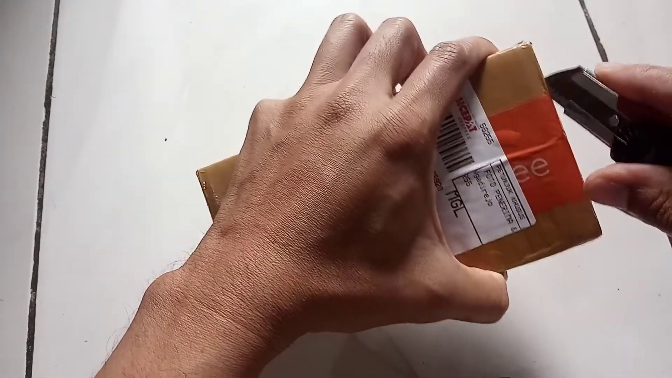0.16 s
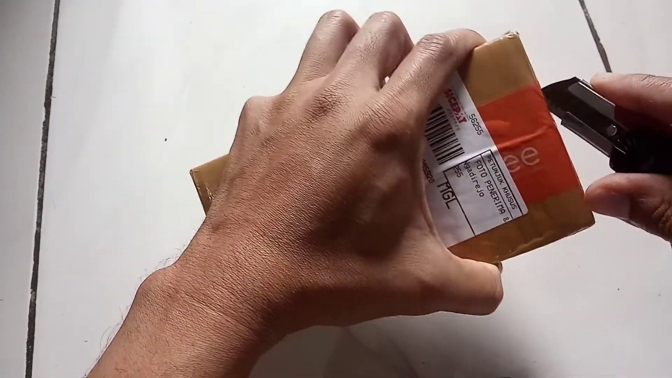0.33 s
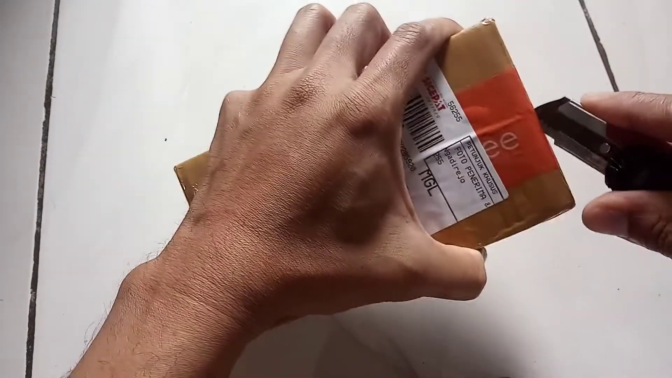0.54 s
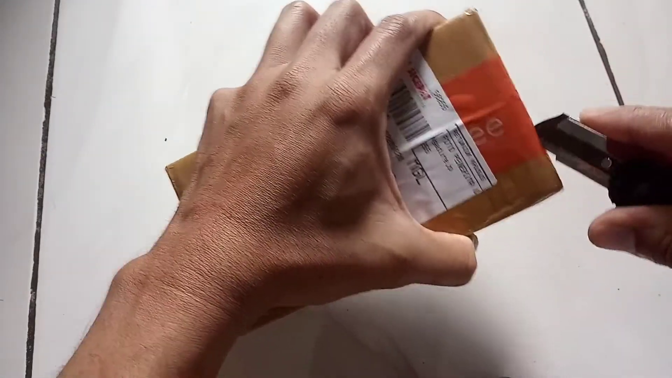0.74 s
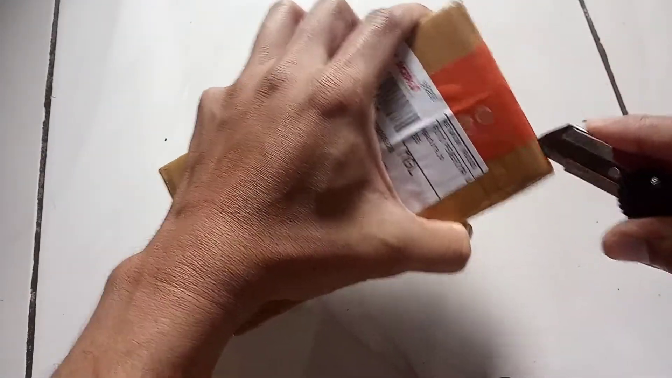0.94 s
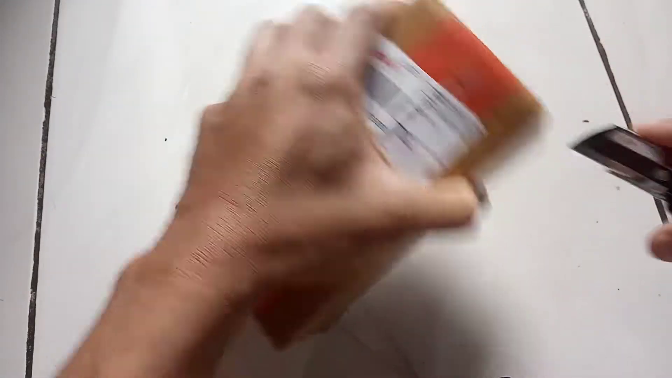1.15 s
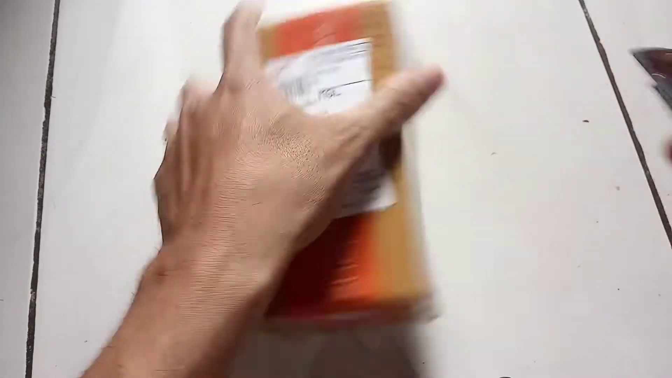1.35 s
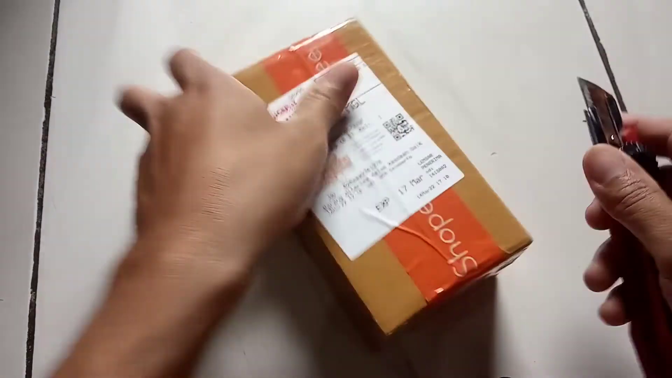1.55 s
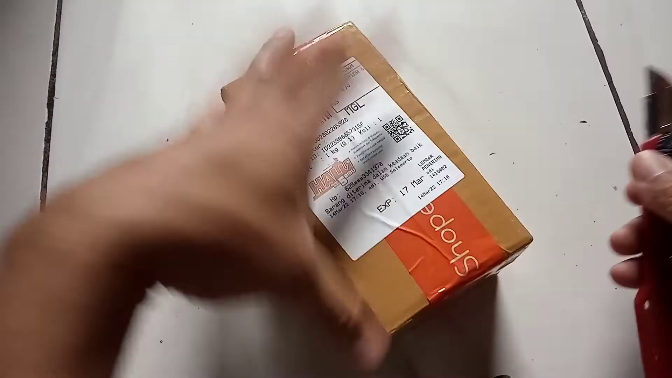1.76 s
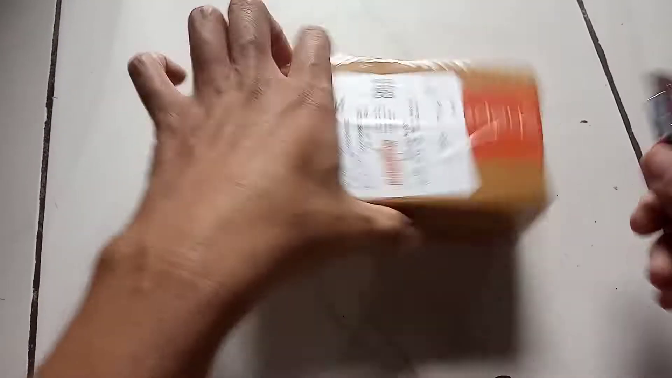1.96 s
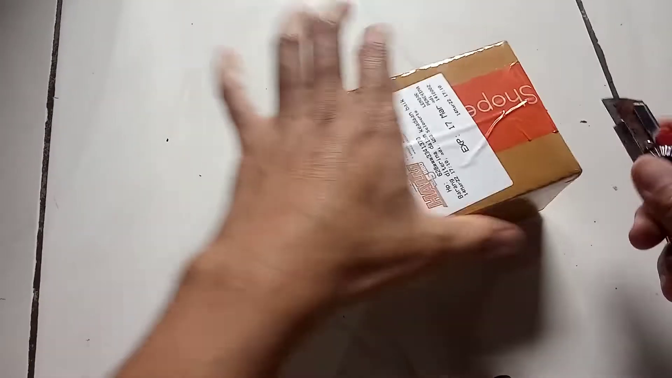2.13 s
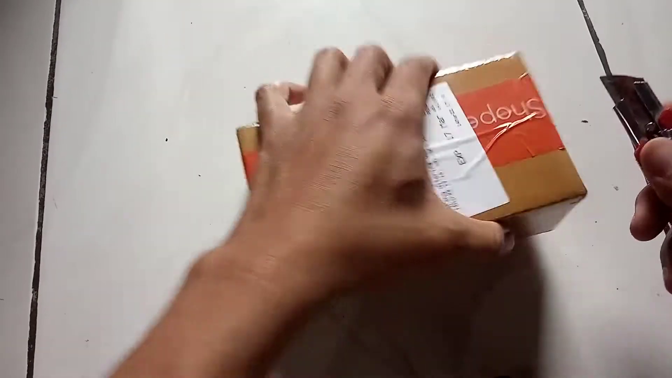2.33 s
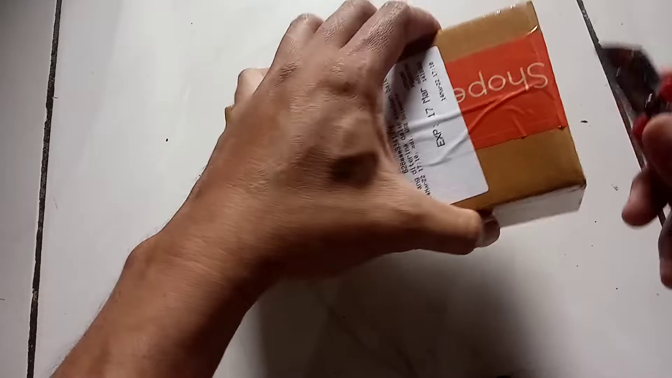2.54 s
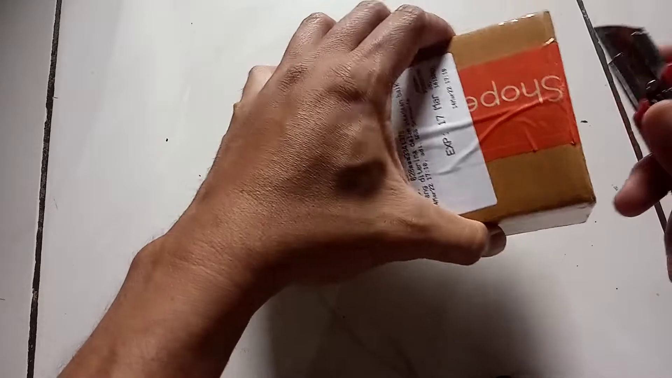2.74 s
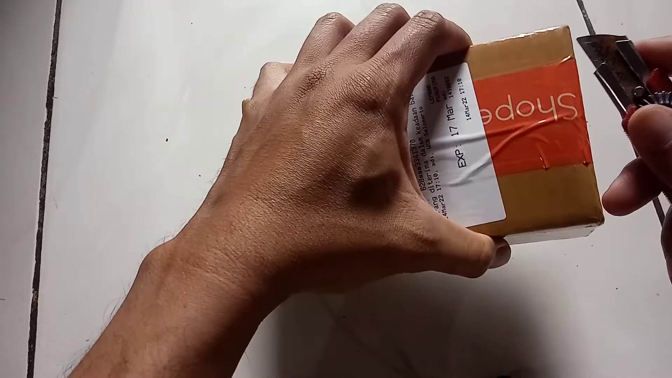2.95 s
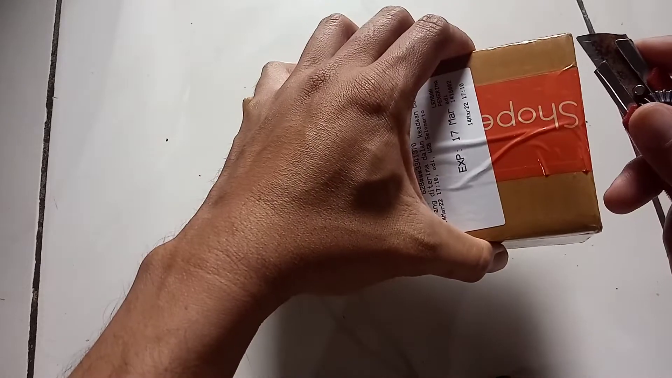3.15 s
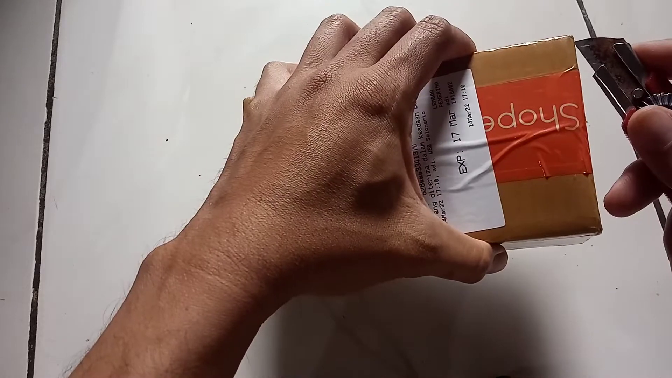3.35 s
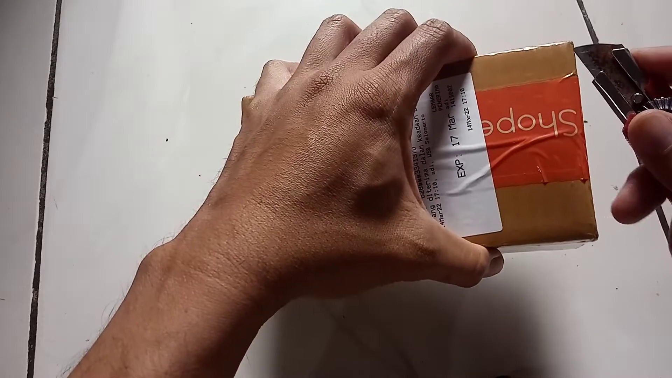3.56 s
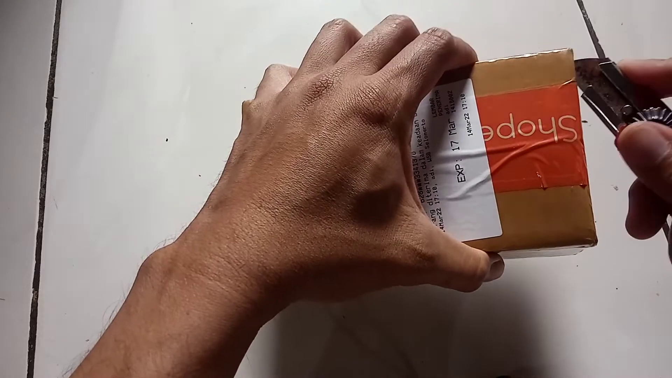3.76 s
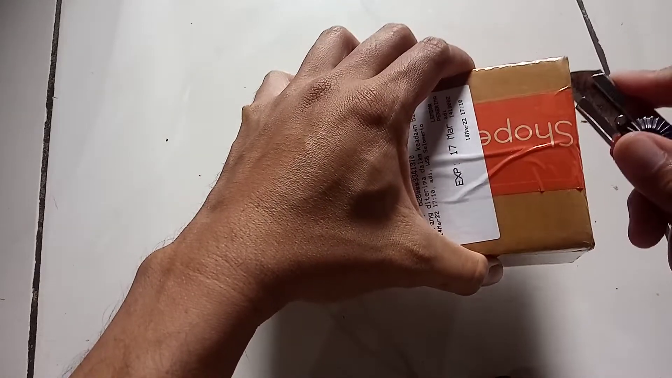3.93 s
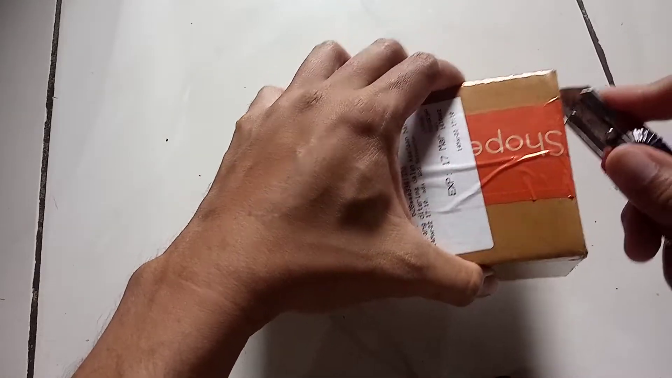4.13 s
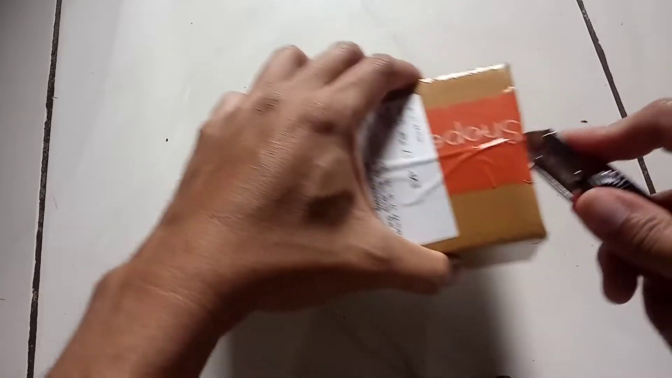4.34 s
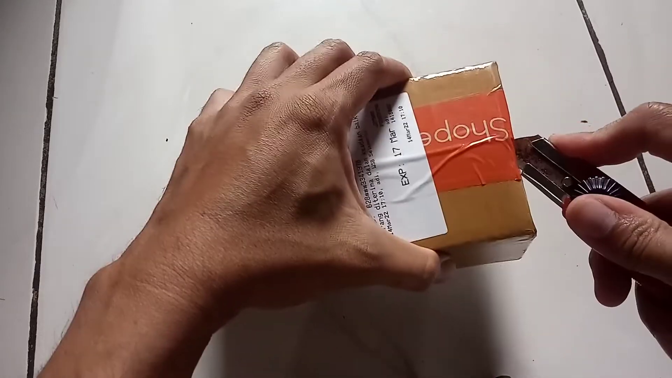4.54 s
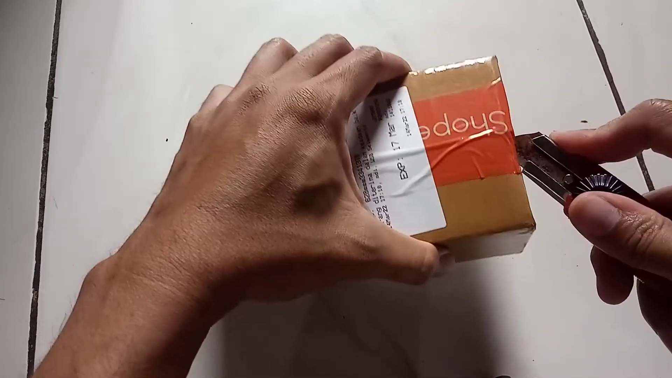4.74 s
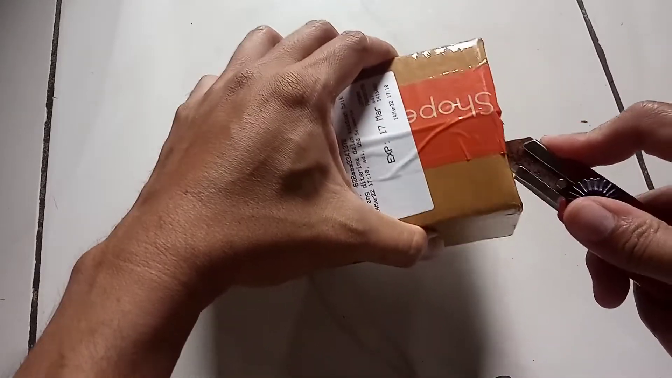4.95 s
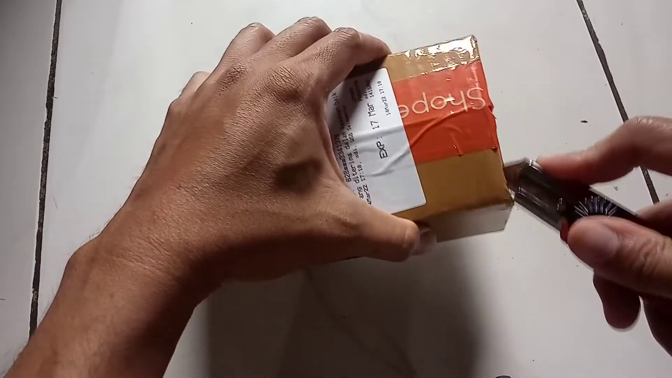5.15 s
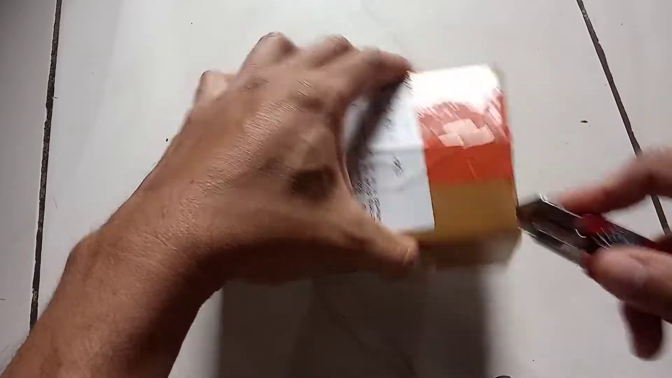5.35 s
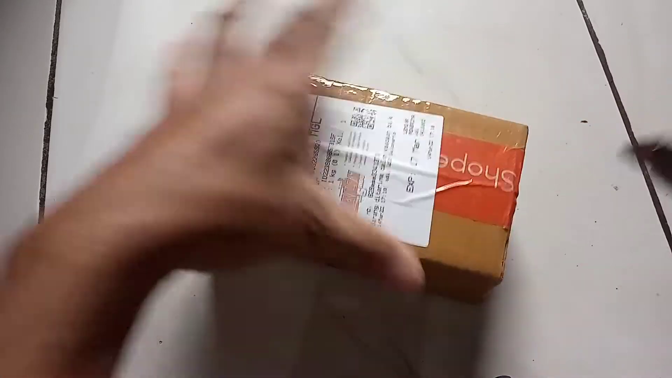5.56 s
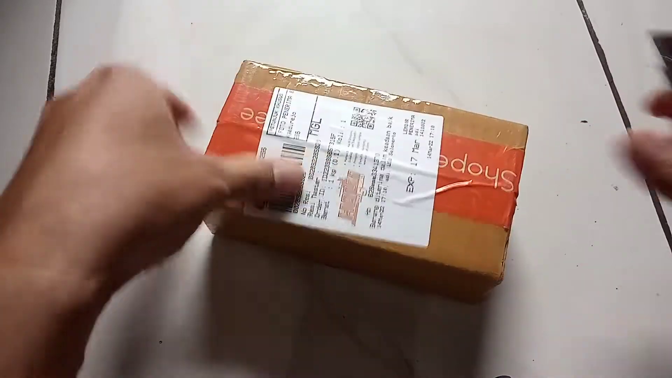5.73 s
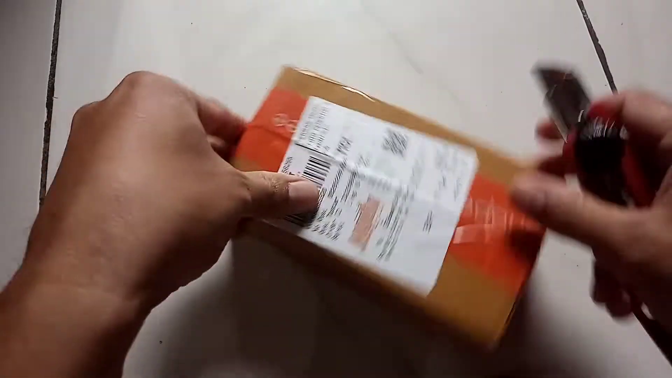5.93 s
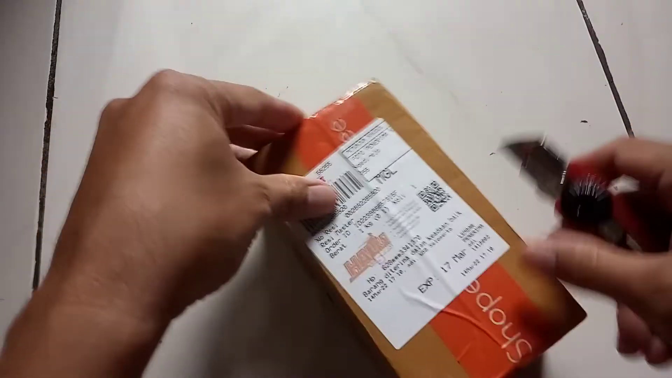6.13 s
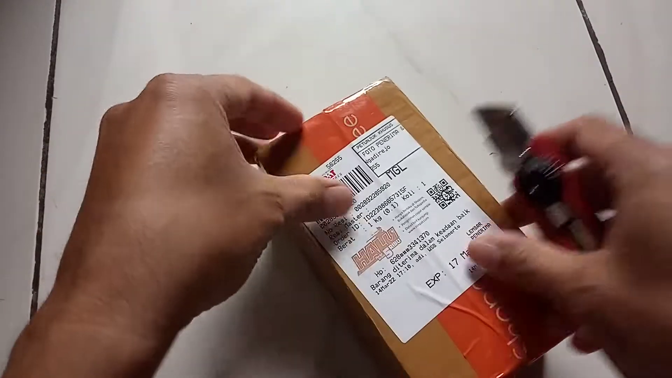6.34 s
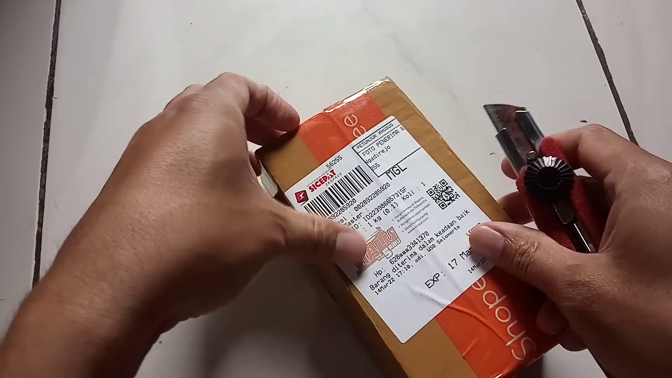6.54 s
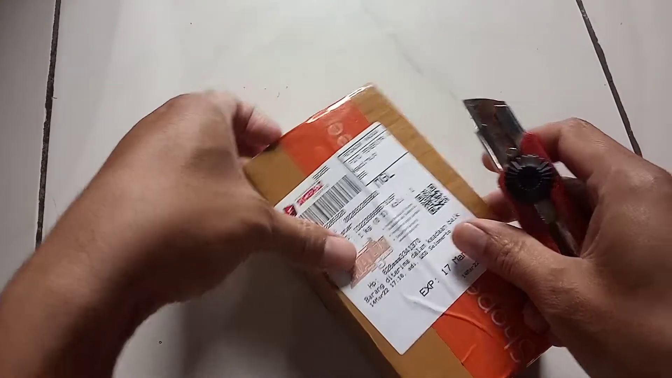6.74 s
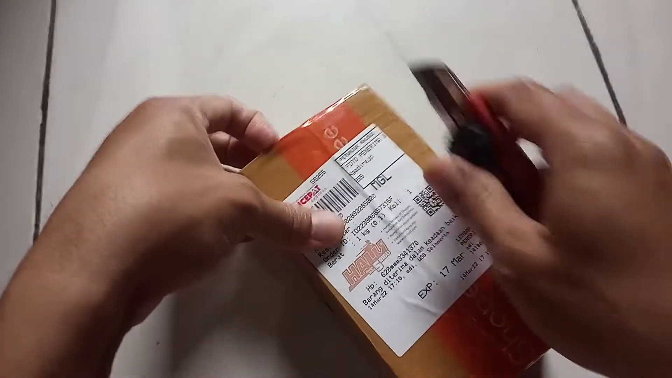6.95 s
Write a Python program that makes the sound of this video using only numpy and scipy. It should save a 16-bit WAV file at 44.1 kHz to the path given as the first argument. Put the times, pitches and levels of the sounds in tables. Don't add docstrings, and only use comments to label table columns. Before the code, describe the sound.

Rough scraping of a blade on taped card, hollow box thumps as it is turned, short tape cuts, more thumps and soft hand rustle.

```python
import sys
import numpy as np
from scipy import signal
from scipy.fft import rfft, irfft, next_fast_len
from scipy.io import wavfile
from scipy.ndimage import uniform_filter1d

SR = 44100
rng = np.random.default_rng(int(sys.argv[2]) if len(sys.argv) > 2 else 0)


def output_pcm(signal):
    pcm = np.clip(np.atleast_2d(signal).T, -1, 1) * 32767
    wavfile.write(sys.argv[1], SR, np.round(pcm).astype(np.int16))


def nominal_scale(level):
    x = np.asarray(level, float) / 20
    return 10 ** x


N = 312669

# frequency in Hz, level in dB per Hz.
TAPE_RASP = [(1530, -23), (2600, -1.5), (2960, 1), (4100, -5.5), (5110, -1.5), (6470, -0.5), (7830, -10.5),
             (9690, -7.5), (12200, -10), (16000, -23)]
# frequency in Hz, level in dB per Hz.
SAW_RASP = [(1350, -31), (2600, 1), (3390, 0), (3720, -3), (4200, -2), (4960, -0.5), (6430, 1), (8320, -8),
            (8980, -7.5), (9330, -3.5), (10800, -1.5), (11900, -8), (14800, -11.5), (16000, -28.5)]
# mode in Hz, width in Hz, level in dB.
SAWN_FLAP = [(900, 150, -10), (1660, 620, -3.5), (1776, 180, 5), (2054, 460, -2), (2430, 230, -4)]
# curve of the rise, curve of the fall, card ring in dB, ring in dB
# per dB of weight, box in dB, box in dB per dB of weight, share by which the box outlasts the rasp.
SAW_RULE = (3, 1, -0.5, -0.14, 0.53, 0.765, 0.0765)


def evened(x):
    return x / np.sqrt(np.mean(x ** 2) + 1e-20)


def add(mix, s, sound):
    part = mix[round(s * SR):][:len(sound)]
    part += sound[:len(part)]


def coloured(x, points):
    f, db = np.transpose(points)
    size = next_fast_len(len(x), True)
    hz = np.fft.rfftfreq(size, 1 / SR)
    gain = nominal_scale(np.interp(np.log(hz + 1), np.log(f), db))
    return irfft(rfft(x, size) * gain, size)[:len(x)]


def resonate(x, hz, width):
    b, a = signal.iirpeak(hz, hz / width, SR)
    return signal.lfilter(b, a, signal.lfilter(b, a, x))


def body(x, modes):
    return sum((-1) ** k * nominal_scale(db) * resonate(x, hz, width) for k, (hz, width, db) in enumerate(modes))


def lumps(n, seconds):
    size = max(int(seconds * SR), 2)
    return evened(uniform_filter1d(uniform_filter1d(rng.standard_normal(n), size), size))


def patchy(x, patchy_db, bins, frames):
    z = signal.stft(x, nperseg=512, noverlap=384)[2]
    patches = uniform_filter1d(uniform_filter1d(rng.standard_normal(z.shape), bins, 0), frames, 1)
    return signal.istft(z * nominal_scale(patchy_db * evened(patches)), nperseg=512, noverlap=384)[1][:len(x)]


def stroke(row, rule):
    s, rise, fall, db, weight = row
    up, down, mid_db, mid_share, box_db, box_share, linger = rule
    depth_db = 30
    u = np.linspace(0, 1, num=12)
    drop = depth_db * np.r_[(1 - u) ** up, (1.25 * u[1:]) ** down]
    t = s + np.r_[rise * u, rise + 1.25 * fall * u[1:]]
    mid = mid_db + mid_share * weight + 0 * t
    box = box_db + box_share * weight + linger * drop * (t > s + rise)
    return np.transpose([t, db - drop, mid, box])


def rub(rows, treble, mids, slips_per_s, slip_db, grit_db, judder_db):
    # mode in Hz, width in Hz, level in dB.
    box_modes = [(293.2, 48.6, 11), (372, 86, 8.5), (489, 113, 8), (607, 26, -7.5), (710, 48, -16)]
    longest = 28000
    s, *columns = np.transpose(rows)
    t = np.arange(s[0], s[-1], 1 / SR)[:longest]
    top_db, mid_db, box_db = (np.interp(t, s, c) for c in columns)
    slip_size = nominal_scale(slip_db * np.minimum(rng.exponential(1, longest), 3))
    slips = (rng.random(longest) < slips_per_s / SR) * slip_size
    sag = signal.lfilter([1], [1, -np.exp(-1 / (0.0056 * SR))], slips)
    grit = nominal_scale(grit_db * lumps(longest, 0.0002) + judder_db * lumps(longest, 0.004))
    drive = evened(((1 + sag) * grit * rng.standard_normal(longest))[:len(t)])
    sound = evened(coloured(drive, treble))
    sound = sound + nominal_scale(mid_db) * evened(body(drive, mids))
    sound = sound + nominal_scale(box_db) * evened(body(drive, box_modes))
    fades = signal.windows.tukey(len(t), 0.0016 / (s[-1] - s[0]))
    return s[0], nominal_scale(top_db) * sound * fades


def room_tone():
    # mode in Hz, width in Hz, level in dB.
    room_modes = [(72, 39, -4), (102.2, 23, 2), (140.4, 22, 1.5), (185, 54, -2.5), (238.7, 31, -6.5)]
    # start in seconds, rise in seconds, fall in seconds,
    # level in dB, tilt toward the highest mode in dB.
    swells = [(0.0, 0.0021, 4.6, -56, 0.5), (.3, 0.15, 0.76, -56, 6.5), (.83, 0.14, 0.38, -55, 2.5),
              (1.131, 0.41, 0.74, -55.5, 10), (1.83, 0.081, 0.11, -52.5, 9), (2.2, 0.09, 1.2, -55.5, 6),
              (2.78, 0.12, 0.82, -59.5, 11), (3.0, 0.24, 0.15, -62, 14.5), (3.4, 0.17, 2.4, -57.5, 3),
              (3.7, 0.52, 0.34, -59.5, 2), (4.62, 0.23, 0.24, -56.5, -2), (4.95, 0.098, 0.55, -51.5, 5),
              (5.201, 0.2, 0.19, -54.5, -3), (6.3, 0.15, 0.22, -56.5, -7.5), (6.5, 0.18, 0.6, -47.5, 5.5)]
    # start in seconds, rise in seconds, fall in seconds,
    # level in dB, tilt in dB.
    rumble = [(1.33, 0.1, 0.29, -39.5, 5.3), (1.5, 0.081, 0.21, -50, 4), (1.715, 0.013, 0.1, -37.5, 8.5),
              (1.987, 0.046, 0.45, -47, -13.5), (2.05, 0.074, 0.3, -43.5, 4), (5.12, 0.049, 0.076, -48, -3),
              (5.41, 0.056, 0.18, -29, 8), (5.58, 0.15, 0.17, -48, -5), (5.831, 0.02, 0.28, -57, -6),
              (5.98, 0.034, 0.094, -61, -24), (6.05, 0.072, 0.17, -53, -11), (6.2, 0.12, 0.22, -56.5, -8.5),
              (6.8, 0.48, 0.18, -57, -3), (6.991, 0.078, 0.018, -55, -14)]
    tone_rule = (3.5, 1.07, -10.5, -0.85, -7, 1.22, 0.0859)
    # frequency in Hz, level in dB per Hz.
    residue_hiss = [(410, -12), (700, -7.5), (757, -14.5), (819, -10), (1350, -11.5), (5060, -14.5),
                    (6230, -14), (8400, -21), (9100, -11), (10200, -20), (16000, -28)]
    quiet_db, residue_db = -80.5, -85.5
    power = np.full((3, N), nominal_scale(2 * quiet_db))
    for row in swells + rumble:
        s, db, low_db, high_db = stroke(row, tone_rule).T
        t = np.arange(s[0], s[-1], 1 / SR)
        for part, part_db in zip(power, (db + low_db, db, db + high_db)):
            add(part, s[0], nominal_scale(2 * np.interp(t, s, part_db)))
    low, middle, high = np.sqrt(power)
    modes = []
    for hz, width, db in room_modes:
        swaying = nominal_scale(db + 1.9 * lumps(N, 0.098))
        modes.append(swaying * evened(resonate(rng.standard_normal(N), hz, width)))
    tone = low * evened(modes[0] + modes[1])
    tone = tone + 0.7 * middle * evened(modes[2] + modes[3]) + high * modes[4]
    residue = patchy(evened(coloured(rng.standard_normal(N), residue_hiss)), 0.61, bins=3, frames=8)
    return tone + nominal_scale(residue_db) * residue


def far_knocks():
    # time in seconds, peak in dB, t60 in seconds, upper modes in relative dB.
    knocks = [
        (2.716, -44, 0.65, 16),
        (3.03, -54, 0.62, -17),
        (3.14, -52, 0.38, -4),
        (3.42, -67, 0.42, -14.5),
        (3.49, -58, 0.28, -1),
    ]
    # mode in Hz, width in Hz, level in dB.
    far_modes = [(501, 38, 5), (551.5, 33, 4.5), (594, 46, 6), (1000, 64, -36), (1500, 59, -26.5),
                 (2320, 125, -32.5)]
    out, t = np.zeros(N), np.arange(20000) / SR
    for s, db, t60, upper_db in knocks:
        tail = rng.standard_normal(len(t)) * (np.exp(-t / 0.0014) + 0.4 * nominal_scale(-60 * t / t60))
        low = body(tail, far_modes[:3])
        upper = body(tail * np.exp(-t / 0.07), far_modes[3:])
        add(out, s, nominal_scale(db) * (low + nominal_scale(upper_db) * upper) / abs(low).max())
    return out


def room(x):
    # frequency in Hz, t60 in seconds.
    decay = [(150, 0.39), (500, 0.59), (1150, 0.32), (1500, 0.31), (5000, 0.3), (12000, 0.28)]
    taps, at = np.zeros(SR // 2), np.arange(250, SR // 2 - 20, 20)
    taps[at + rng.integers(0, 20, len(at))] = rng.choice([-1., 1.], len(at))
    hz, t, z = signal.stft(taps, SR, nperseg=256)
    t60 = np.interp(hz, *np.transpose(decay))[:, None]
    tail = signal.istft(z * nominal_scale(-60 * t / t60), SR, nperseg=256)[1]
    return signal.fftconvolve(x, tail / np.linalg.norm(tail))[:N]


def hums():
    # time in seconds, level in dB, pitch in Hz, t60 in seconds, width as a share of the pitch.
    hum_events = [(1.395, -40.5, 600, 0.35, 0.32), (1.46, -55.5, 1080, 0.37, 0.48),
                  (1.525, -47, 516, 0.2, 0.4), (2.19, -57, 1000, 0.27, 0.23), (2.47, -77.5, 3250, 1.5, .08),
                  (4.03, -58, 6500, 0.58, 0.83), (4.058, -62.5, 2660, 0.2, 0.054),
                  (4.686, -64.5, 1300, 0.25, .1), (4.69, -71, 2270, 0.25, 0.054),
                  (4.695, -72, 3230, 0.37, 0.093), (4.695, -67, 5080, 0.21, 0.04),
                  (4.7, -71, 6030, 0.18, 0.042), (4.96, -61, 540, 0.67, 0.17), (5.045, -46, 1050, 0.13, .2),
                  (5.16, -59, 530, 0.45, .25), (5.28, -60, 517, 1, 0.28), (5.49, -46, 567, 0.4, 0.35),
                  (6.115, -66, 1144, 0.31, 0.13), (6.13, -68, 2070, 0.46, 0.25),
                  (1.95, -64.5, 2290, 0.13, 0.071), (2.19, -55.5, 750, 0.54, 0.31),
                  (1.752, -54, 1710, .08, .25), (6.525, -55.5, 1500, .3, 0.2), (6.58, -65, 1260, .5, .15),
                  (7.045, -57, 1770, 0.13, 0.25), (1.34, -52.5, 1900, .1, 0.45),
                  (1.716, -60.5, 2000, .12, 0.29), (.365, -50.5, 6300, 0.52, .1),
                  (.64, -52, 1764, 0.81, 0.088), (.87, -48.5, 1746, 0.56, 0.11),
                  (.88, -58, 10500, .6, 0.12), (5.312, -61.5, 1770, .3, .2), (4.752, -60, 3300, .2, .2),
                  (5.17, -66, 1700, 0.54, 0.31), (2.78, -74, 950, .8, 0.14), (6.19, -67.5, 6280, .5, .15),
                  (5.455, -30, 195, .5, .15), (2.608, -64, 3300, .07, .1), (3.255, -66, 2500, .8, .12),
                  (3.7, -64, 1050, .4, .12)]
    out, t = np.zeros(N), np.arange(9000) / SR
    fade = np.cos(np.pi / 2 * t / t[-1])
    for s, db, hz, t60, share in hum_events:
        ring = resonate(rng.standard_normal(len(t)), hz, share * hz)
        add(out, s, nominal_scale(db - 60 * t / t60) * np.minimum(t / 0.0075, 1) * fade * evened(ring))
    return out


def pings():
    # time in seconds, peak in dB, pitch in Hz, t60 in seconds.
    ping_events = [
        (1.097, -56, 2850, 0.23),
        (2.186, -58, 904, 0.37),
        (2.259, -39, 5200, 0.0098),
        (2.363, -70.5, 1254, 0.036),
        (2.611, -64.5, 1290, 0.09),
        (4.454, -61, 1220, 0.091),
        (4.699, -53, 933, 0.096),
        (5.637, -56.5, 5000, 0.16),
        (7.1, -51, 1340, .3),
    ]
    out, t = np.zeros(N), np.arange(9000) / SR
    fade = np.cos(np.pi / 2 * t / t[-1])
    for s, db, hz, t60 in ping_events:
        ring = resonate(rng.standard_normal(len(t)) * nominal_scale(-60 * t / t60), hz, 0.09 * hz)
        add(out, s, nominal_scale(db) * fade * ring / abs(ring).max())
    return out


def ticks():
    # time in seconds, peak in dB.
    fibres = [(4.1893, -33.5), (4.313, -34), (4.3555, -41), (4.3843, -46), (4.4557, -54), (4.838, -29.5),
              (5.1418, -35.5), (2.286, -53), (4.7527, -54.5), (5.062, -44), (5.345, -46), (5.8894, -51),
              (5.9193, -47.5), (5.985, -49.5), (5.52, -49.5)]
    out, t = np.zeros(N), np.arange(800) / SR
    for s, db in fibres:
        snap = evened(coloured(rng.standard_normal(len(t)), TAPE_RASP))
        add(out, s, nominal_scale(db) * 0.5 * snap * np.exp(-t / 0.0023))
    return out


def hand():
    # start in seconds, rise in seconds, fall in seconds,
    # skin hiss in dB, weight in dB.
    slides = [(1.2, 0.11, 0.18, -68.5, -4), (1.34, 0.058, 0.24, -57, 9), (1.74, 0.16, 0.17, -52, -6),
              (1.9, 0.1, 0.12, -64.5, -25.5), (2.07, 0.083, 0.075, -67, -21), (2.17, 0.013, 0.25, -70.5, 0),
              (2.2, 0.043, 0.2, -71.5, -17), (2.43, 0.044, 0.21, -80, -11), (5.4, 0.014, 0.26, -55, 3.5),
              (5.6, 0.098, 0.13, -73.5, -13), (5.71, 0.037, 0.56, -55, -12), (5.78, 0.195, 0.05, -59, -8),
              (6.08, 0.032, 0.018, -59, 6), (6.11, .03, 0.54, -70.5, 1), (6.2, .13, 0.14, -70, -2),
              (6.49, 0.089, 0.39, -86, -12), (6.63, 0.1, 0.3, -63.5, -1), (6.72, 0.13, 0.11, -60, -9.5),
              (6.85, 0.043, 0.23, -58, -25), (7.02, 0.045, 0.068, -75, 6)]
    touches = [
        (3.2, 0.071, 0.35, -72, -47.5),
        (3.3, 0.2, 0.064, -55.5, -16.5),
        (3.45, 0.086, .15, -59.5, -21),
    ]
    scratches = [
        (1.79, 0.035, 0.15, -61, 8.5),
        (5.31, 0.035, 0.14, -61.5, 7.5),
        (6.51, 0.019, 0.4, -75, 14),
    ]
    hand_rule = (1.5, 1.08, -5.5, 0.99, 2.5, 1.82, 0.16)
    scratch_rule = (1.5, 1.3, -5, 1.25, -24, 1.83, -0.36)
    # frequency in Hz, level in dB per Hz.
    skin_hiss = [(1530, -28.5), (2400, -2.5), (3550, -6), (5080, -3.5), (6330, 1.5), (7890, -8),
                 (10300, -2), (15100, -14), (16000, -25)]
    # frequency in Hz, level in dB per Hz.
    soft_hiss = [(880, -44.5), (1500, -23), (1810, -6), (2610, -3), (3220, -1), (5020, -1.5), (8240, -11.5),
                 (11200, -14), (16000, -38.5)]
    # mode in Hz, width in Hz, level in dB.
    card = [(940, 190, -18), (1290, 230, 11.5), (1772, 630, 3.5), (2600, 2600, 2)]
    out = np.zeros(N)
    gestures = ((slides, hand_rule, skin_hiss), (touches, hand_rule, soft_hiss),
                (scratches, scratch_rule, skin_hiss))
    for rows, rule, treble in gestures:
        for row in rows:
            add(out, *rub(stroke(row, rule), treble, card,
                          slips_per_s=8, slip_db=0.6, grit_db=1.1, judder_db=0.5))
    return patchy(out, 3.7, bins=2, frames=28)


def all_blows():
    # time in seconds, peak in dB, box pitch in Hz,
    # flap ring in relative dB, crack in relative dB.
    thuds = [(1.209, -40.5, 200, -33.5, -19.5), (1.348, -17, 252, -22, -30), (1.382, -8.5, 319, -14, -16.5),
             (1.516, -22, 230, -23.5, -24), (1.724, -24.5, 262, -23, -23.5), (1.811, -42, 250, -3, -29),
             (1.874, -46, 188, -10, 12.5), (2.177, -19, 381, -9, -17), (2.257, -37, 221.8, -20, -3.5),
             (5.423, -14, 290, -28, -33), (5.45, -8, 337, -19, -24), (5.477, -15.5, 331, -13.5, -19.5),
             (5.488, -19, 191, -36, -31), (5.738, -29, 219, -14.5, -31), (6.285, -32, 208, -39.5, -26),
             (6.31, -40.5, 187, -21.5, -16), (7.047, -29, 290, -15.5, -15.5), (1.404, -28.5, 297, -27, -35),
             (1.53, -30, 264, -23.5, -24), (5.147, -35, 200, -30, -27), (5.339, -39, 153, -17, -12)]
    # time in seconds, peak in dB, flap pitch in Hz,
    # flap ring in relative dB, crack in relative dB.
    snags = [(0.878, -39.5, 1780, -0.5, 4.5), (3.637, -29, 860, -4, -1), (4.247, -33.5, 930, -4, -3.5),
             (4.259, -32, 1000, -6, -3.5), (4.281, -33, 1000, -12, -2.5), (4.31, -36.5, 1140, 1.5, 4),
             (4.789, -30, 816, -3, 0), (4.832, -37.5, 1170, -2, 2), (5.006, -32.5, 1390, -6, 0),
             (5.078, -37.5, 1090, -6.5, 3.5), (5.141, -26, 1065, -5.5, -6), (6.098, -44, 1030, 10, -8.5),
             (6.104, -41, 1110, 6, 6), (5.123, -49, 1080, 2.5, -12), (4.773, -46, 910, -1, 1),
             (4.188, -40, 960, 1, -11)]
    taps = [
        (1.756, -36.5, 2860, -23, -9.5),
        (2.529, -58.5, 1660, 4, -15),
        (2.613, -56, 1280, -15, -9),
        (5.371, -41.5, 3100, -10, 9),
        (5.86, -48, 1000, 9.5, 0),
        (6.393, -49.5, 1620, -13, -14),
        (6.848, -49, 1210, 6.5, 12),
    ]
    thud_flap_hz, snag_box_hz, tap_box_hz = 927.5, 474, 194
    rows = [(s, db, hz, thud_flap_hz, *rest) for s, db, hz, *rest in thuds]
    rows += [(s, db, snag_box_hz, *rest) for s, db, *rest in snags]
    return rows + [(s, db, tap_box_hz, *rest) for s, db, *rest in taps]


def blows():
    # mode in Hz, width in Hz, level in dB.
    struck = [(931, 200, 5), (1229, 620, 1), (1900, 360, 0.5), (2326, 430, -3)]
    out, t = np.zeros(N), np.arange(4000) / SR
    for s, db, box_hz, flap_hz, flap_db, crack_db in all_blows():
        puff = rng.standard_normal(len(t))
        turns = box_hz * t
        box = np.sin(2 * np.pi * turns) * np.exp(-turns / 1.124)
        box = box + 0.25 * np.sin(2 * np.pi * 1.603 * turns) * np.exp(-turns / 1.13)
        push = 1 - np.exp(-(turns / 0.63) ** 2)
        burst = puff * np.exp(-t / 0.0031)
        flap = evened(resonate(burst, flap_hz, 240)) + 0.57 * evened(body(burst, struck))
        crack = coloured(puff, TAPE_RASP) * (np.exp(-t / 0.0011) + 0.22 * np.exp(-t / 0.0082))
        flap, crack = flap / abs(flap).max(), crack / abs(crack).max()
        add(out, s + 0.002, nominal_scale(db) * (1.86 * box * push + nominal_scale(flap_db) * flap + nominal_scale(crack_db) * crack))
    return out


def catches():
    # start in seconds, rise in seconds, fall in seconds, tape rasp in dB, weight in dB.
    catch_events = [(.213, 0.0079, 0.038, -51, 13), (.238, 0.0064, .02, -53.5, 8),
                    (0.367, 0.0043, .025, -46.5, 5), (.386, 0.014, 0.027, -45.5, 4.5),
                    (.417, 0.0071, .016, -47, 6), (.438, .01, .015, -47, 3), (.562, 0.0037, .02, -68, 5),
                    (.583, 0.0061, 0.018, -54, 6), (.64, 0.027, 0.039, -51.5, 12),
                    (.708, 0.0073, 0.019, -46.5, 6), (.726, 0.0091, 0.025, -51, 5.5),
                    (0.771, .008, 0.019, -55, 5), (.871, 0.0069, 0.029, -46, 8),
                    (0.901, .008, 0.021, -49, 0), (.925, 0.0047, 0.02, -45.5, 3), (.946, .01, .014, -46, 0)]
    out = np.zeros(N)
    for row in catch_events:
        add(out, *rub(stroke(row, SAW_RULE), SAW_RASP, SAWN_FLAP,
                      slips_per_s=240, slip_db=0.0, grit_db=1.7, judder_db=0.5))
    return out


def knife():
    # start in seconds, rise in seconds, fall in seconds, tape rasp in dB, weight in dB.
    saws = [(0.0, 0.001, 0.1, -63.5, 15.5), (0.111, 0.019, 0.077, -53.5, 11.5), (.12, 0.019, 0.45, -57, 10),
            (.2, 0.028, 0.086, -54.5, 9), (.326, 0.023, 0.039, -50.5, 10.5), (.33, 0.071, 0.2, -49.5, 3),
            (0.539, 0.051, 0.27, -55, 2.5), (0.641, 0.038, 0.19, -48, 3.5), (.83, 0.08, 0.09, -53.5, 8),
            (.85, 0.1, 0.07, -49.5, -3), (1.061, 0.044, 0.023, -58, -4.5)]
    cuts = [(3.632, 0.011, 0.023, -52, 5), (3.647, 0.02, 0.027, -51.5, 1.5), (3.779, 0.014, .15, -67, 1),
            (3.801, 0.031, 0.036, -61, 1.5), (4.02, 0.1, 0.34, -50.5, -15), (4.08, .13, 0.3, -49.5, 0),
            (4.3, 0.011, 0.037, -58, 0.5), (4.298, .05, 0.14, -65.5, -10), (4.44, 0.016, 0.045, -64, -12),
            (4.679, 0.01, .15, -73, 3.5), (4.72, 0.077, 0.22, -59, 0), (4.77, 0.082, 0.22, -51.5, -15),
            (4.879, 0.12, 0.15, -62.5, -9), (4.994, 0.016, 0.049, -53, 2.5),
            (5.035, 0.017, 0.067, -53.5, 2.5), (5.109, 0.04, 0.021, -59.5, 6.5)]
    cut_rule = (1.71, 1.24, 0.05, 1.26, 0.16, 1.6, 0.33)
    # mode in Hz, width in Hz, level in dB.
    seam = [(910, 660, 11), (1276, 430, 11), (1710, 890, 9.5), (2680, 880, 8)]
    out = np.zeros(N)
    for row in saws:
        add(out, *rub(stroke(row, SAW_RULE), SAW_RASP, SAWN_FLAP,
                      slips_per_s=180, slip_db=-4.5, grit_db=1.1, judder_db=0.95))
    for row in cuts:
        add(out, *rub(stroke(row, cut_rule), TAPE_RASP, seam,
                      slips_per_s=25, slip_db=0.6, grit_db=1.5, judder_db=0.4))
    return patchy(out, 2.6, bins=2, frames=22)


def scene():
    hits, cuts = blows(), knife() + catches()
    near = hits + cuts + hand() + pings() + ticks() + hums()
    echo = nominal_scale(-14) * room(hits) + nominal_scale(-16) * room(cuts)
    return (near + echo + far_knocks() + room_tone())[None]


def low_pass(x):
    return signal.sosfilt(signal.butter(12, 16480, fs=SR, output="sos"), x)


def record(dry):
    mix = signal.oaconvolve(dry, signal.firwin(255, 16500, fs=SR)[None], "same")
    mix = signal.sosfilt(signal.butter(3, 50, "high", fs=SR, output="sos"), mix)
    return low_pass(mix)


dry = scene()
out = record(dry)
output_pcm(out)
```